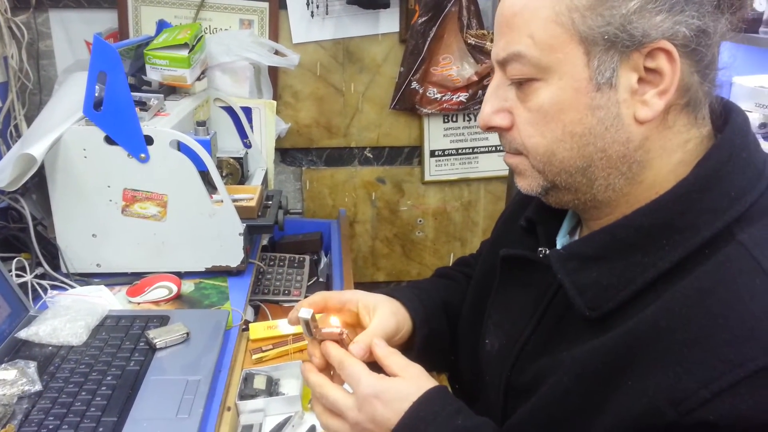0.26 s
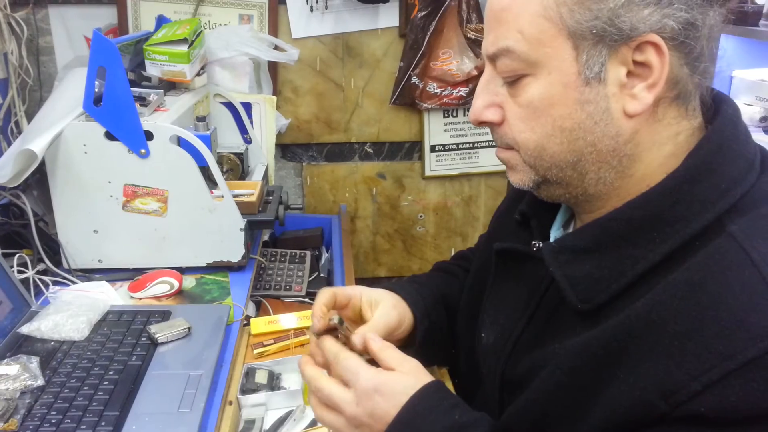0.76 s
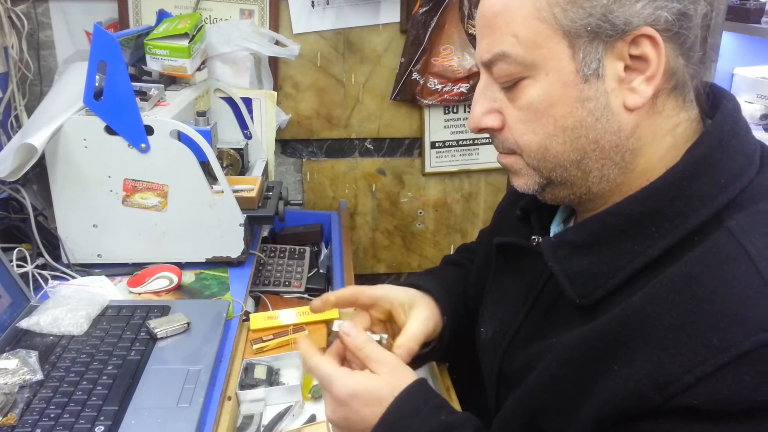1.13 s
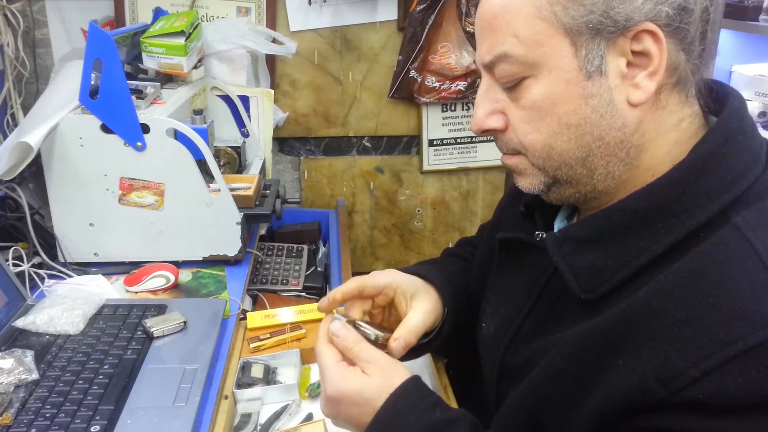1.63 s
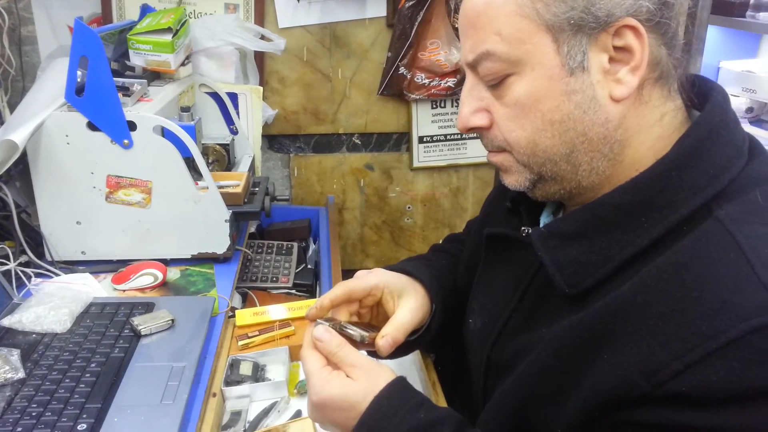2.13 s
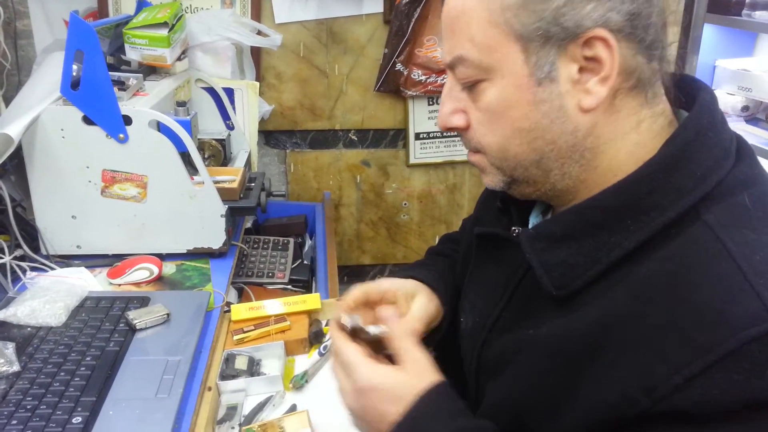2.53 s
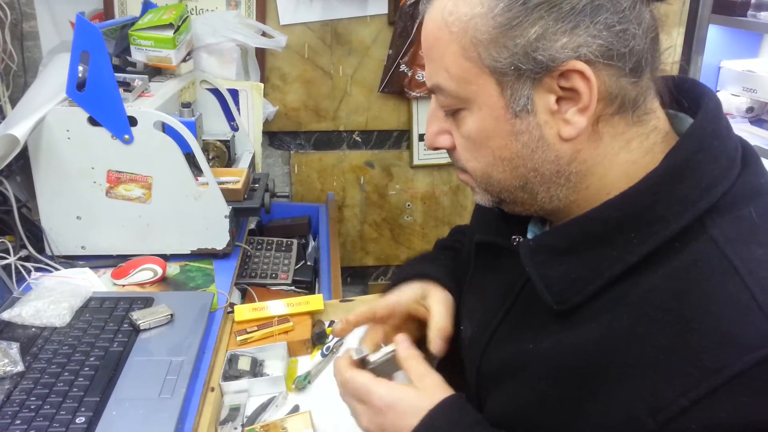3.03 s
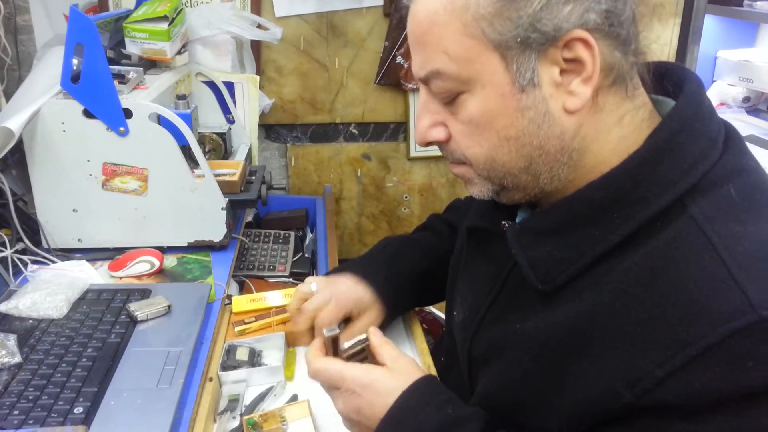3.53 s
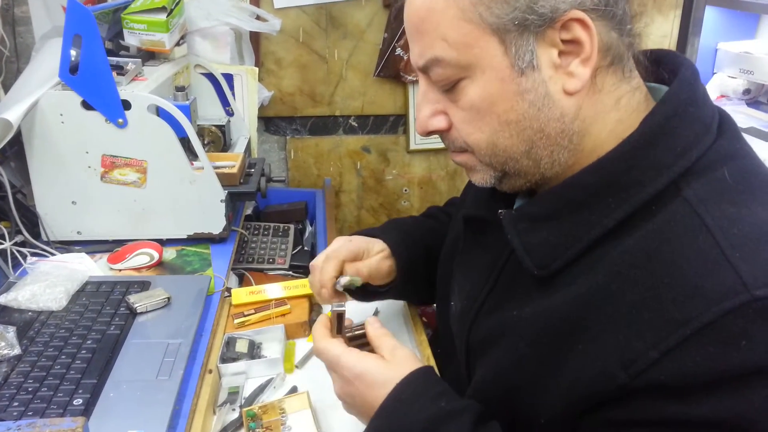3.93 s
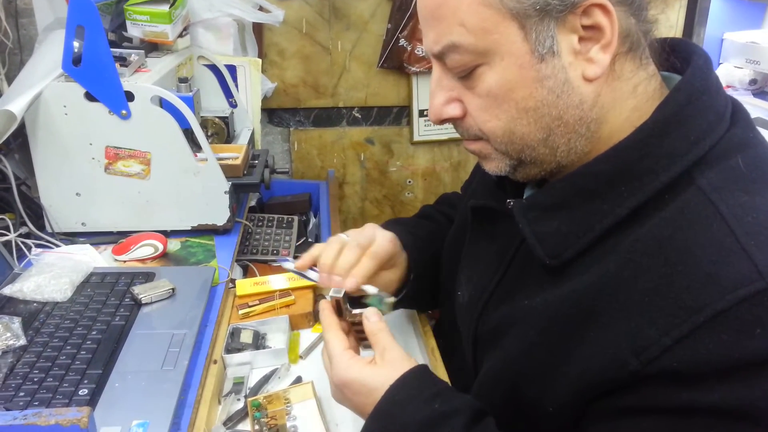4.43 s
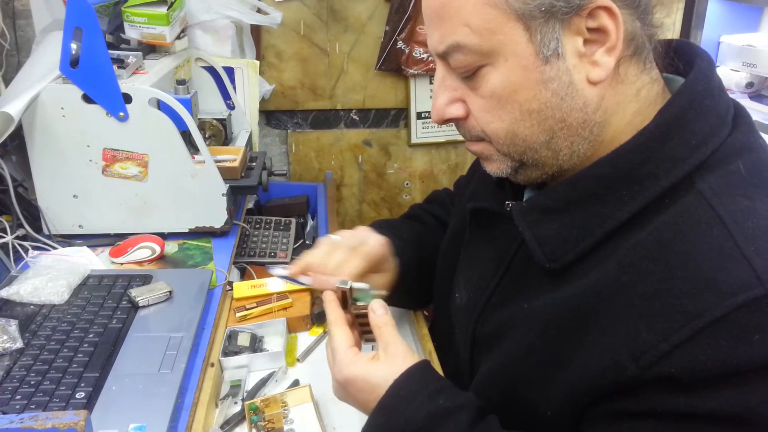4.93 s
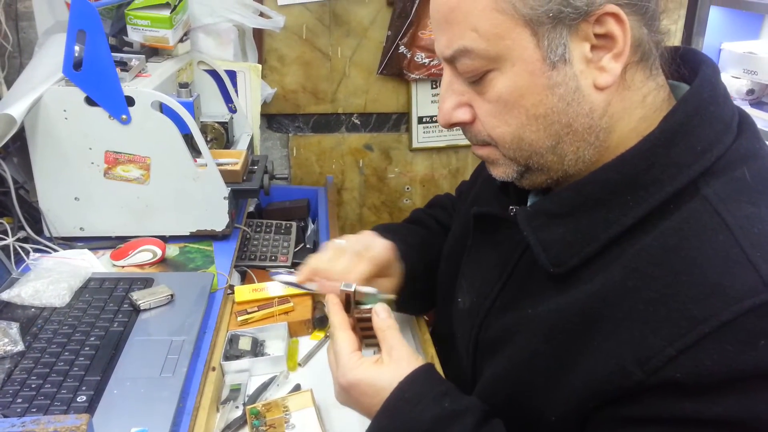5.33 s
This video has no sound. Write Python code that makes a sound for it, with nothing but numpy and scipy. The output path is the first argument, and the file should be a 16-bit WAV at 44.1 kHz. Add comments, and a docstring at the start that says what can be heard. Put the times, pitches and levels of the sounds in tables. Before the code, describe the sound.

Close to the microphone in a small, quiet shop, a metal lighter snaps shut with a sharp click, then flicks open with one short, clear ring. After a pause, a cardboard box is knocked and slid on a workbench with soft hollow taps and scrapes. It rubs against the lighter, which gives a small ringing tick and faint swishes. A low machine hum and hiss lie underneath.

```python
"""A low machine hum, room hiss and thin electrical whines fill a small shop. Near a two-port microphone
a metal lighter is snapped shut and flicked open: each impact excites the modes of its case, and the
lid rings with one clear note. Then a cardboard box is knocked and slid on the bench, its hollow body
resonating, and rubbed against the lighter with a soft hiss of friction."""
import sys
import numpy as np
from scipy import signal
from scipy.fft import rfft, irfft
from scipy.io import wavfile
from scipy.ndimage import uniform_filter1d, minimum_filter1d

SR = 44100
rng = np.random.default_rng(int(sys.argv[2]) if len(sys.argv) > 2 else 0)


def transcribe(u):
    """Save the signal u as a 16-bit wav file named by the first command-line argument.

    u: samples, shape (n,) or (channels, n), limited to [-1, 1]; the rate is SR.
    q: integer samples, one column per channel.
    """
    v = np.clip(np.atleast_2d(u).T, -1, 1)
    q = np.round(v * 32767).astype(np.int16)
    wavfile.write(sys.argv[1], SR, q)


N = 246166
EVENT_SAMPLES = 12000
NEAR_LAG_S, WIDE_LAG_S = 4 / SR, 16 / SR  # the right port hears later


def gain_of(db):
    """Amplitude grows tenfold for every 20 dB."""
    return 10 ** (np.asarray(db) / 20)


def unit_rms(x):
    """Normalisation to a mean power of one."""
    return x / np.sqrt(np.mean(x ** 2) + 1e-20)


def at_hz(points, hz):
    """Interpolation of a curve along a logarithmic frequency axis."""
    point_hz, value = np.transpose(points)
    return np.interp(np.log(hz + 1), np.log(point_hz + 1), value)


def smooth(x, span_s):
    """Two moving averages act as a low-pass filter."""
    size = round(span_s * SR)
    return uniform_filter1d(uniform_filter1d(x, size), size)


def add(mix, start_s, sound):
    """Superposition: a sound sums into the mix from its start time on."""
    part = mix[:, round(start_s * SR):][:, :sound.shape[1]]
    part += sound[:, :part.shape[1]]


def sides(pan_db):
    """A level difference, left over right, split evenly between the ports."""
    return gain_of(np.multiply.outer([.5, -.5], pan_db))


def colour(x, spectrum, tilt_db=0):
    """Minimum-phase filter, tilted by tilt_db per octave about 3 kHz; white noise keeps its power."""
    hz = abs(np.fft.fftfreq(4096, 1 / SR))
    shape_db = np.maximum(at_hz(spectrum, hz) + tilt_db * np.log2((hz + 50) / 3000), -100)
    log_gain = np.log(unit_rms(gain_of(shape_db)))
    taps = np.fft.ifft(np.exp(np.conj(signal.hilbert(log_gain)))).real
    return signal.fftconvolve(x, taps[None], axes=1)[:, :x.shape[1]]


def resonate(x, hz, width_hz):
    """A damped oscillator driven by x, with a gain near one at resonance."""
    radius, angle = np.exp(-np.pi * width_hz / SR), 2 * np.pi * hz / SR
    feedback = [1, -2 * radius * np.cos(angle), radius ** 2]
    return signal.lfilter([1 - radius ** 2], feedback, x) * np.sin(angle)


def noise(n, grain_db=0, lag_s=NEAR_LAG_S):
    """Partly coherent noise at two ports, alike in the bass, late on the right; grain makes it lumpy."""
    # likeness of the two ports: frequency_hz, correlation
    coherence = [(60, 0.92), (300, 1), (700, 0.85), (2000, 0.23), (6000, 0.2), (14000, 0.17)]
    left, unrelated = rfft(rng.standard_normal((2, n)))
    hz = np.fft.rfftfreq(n, 1 / SR)
    alike = np.clip(at_hz(coherence, hz), 0, 1)
    right = (alike * left + np.sqrt(1 - alike ** 2) * unrelated) * np.exp(-2j * np.pi * hz * lag_s)
    lumps = gain_of(grain_db * unit_rms(uniform_filter1d(rng.standard_normal(n), size=60)))
    return irfft([left, right], n) * unit_rms(lumps)


def burst(rise_s, t60_s, grain_db=0, lag_s=NEAR_LAG_S, bend=1):
    """Noise rises smoothly, then decays exponentially; a bend over 1 rounds the fall."""
    t = np.arange(EVENT_SAMPLES) / SR
    attack = np.sin(np.pi / 2 * np.clip(t / rise_s, 0, 1)) ** 2
    fall_db = -60 * (np.maximum(t - rise_s, 0) / t60_s) ** bend
    return noise(len(t), grain_db, lag_s) * attack * gain_of(fall_db)


def wavering(n, start_hz, end_hz, waver_hz, flicker_db=2.5):
    """Random frequency and amplitude modulation make a tone drift and flicker."""
    drift, flicker = (unit_rms(smooth(v, .02)) for v in rng.standard_normal((2, n)))
    cycles = np.cumsum(np.linspace(start_hz, end_hz, n) + waver_hz * drift) / SR
    port_phase = np.outer([0, 1], 2 * np.pi * start_hz * WIDE_LAG_S)
    return np.sin(2 * np.pi * cycles - port_phase) * gain_of(flicker_db * flicker)


def machine_hum():
    """A machine's periodic vibration gives two low, wavering tones that weaken late on."""
    # tones of the machine: pitch_hz, waver_hz, level_db
    partials = [(84, 4, -5), (145.2, 2.5, 0)]
    # course of the hum: time_s, gain_db
    course = [(0, -1), (4.0, 1.2), (4.3, -8.5), (5.58, -10)]
    hum = sum(gain_of(db) * wavering(N, hz, hz, waver_hz) for hz, waver_hz, db in partials)
    return hum * gain_of(np.interp(np.arange(N) / SR, *np.transpose(course)))


def swell(handling):
    """Envelope following: the gain of rumble and hum wanders, and lifts while the handling is loud."""
    # gain at rest: time_s, gain_db
    resting = [(0, -72), (1.3, -69), (2.1, -70), (2.8, -72.5), (4.2, -70), (5.58, -72)]
    knee_db, lift_per_db, max_lift_db, delay_s = -72, 0.29, 15.5, 0.024
    t = np.arange(N) / SR
    power_db = 10 * np.log10((handling ** 2).mean(0) + 1e-12)
    envelope_db = smooth(-minimum_filter1d(-power_db, size=200), .04)  # smoothed running maximum
    lift_db = np.clip(lift_per_db * (envelope_db - knee_db), 0, max_lift_db)
    late_lift_db = np.interp(t - delay_s, t, lift_db)
    wander_db = 0.5 * unit_rms(smooth(rng.standard_normal(N), .03))
    return gain_of(np.interp(t, *np.transpose(resting)) + late_lift_db + wander_db)


def shop(handling):
    """The noise floor: steady broadband hiss over a low rumble and hum that swell together."""
    # spectrum of the room hiss: frequency_hz, density_db
    hiss_spectrum = [(240, -31), (400, -15.5), (915, -11), (1700, -11.5), (3820, -19.5), (4650, -15.5),
                     (6570, -20), (9280, -19), (14600, -27.5)]
    # spectrum of the rumble: frequency_hz, density_db
    rumble_spectrum = [(15, -52), (30, -36), (55, -26), (78, -5.5), (112, -12.5), (144, -9), (248, -16),
                       (438, -20.5), (900, -32.5), (1500, -60)]
    hum = machine_hum()
    hiss = gain_of(-76.5) * colour(noise(N, lag_s=WIDE_LAG_S), hiss_spectrum)
    low_gain = swell(handling)
    rumble = colour(noise(N, lag_s=WIDE_LAG_S), rumble_spectrum)
    return hiss + low_gain * (rumble + hum)


def whines():
    """Narrowband tones: an electrical whine that keeps breaking off, and other thin tones."""
    # spans in which the whine sounds: start_s, end_s
    spans = [(.33, 1.28), (1.36, 1.92), (1.96, 2.55), (2.6, 3.19), (3.24, 5.1)]
    # other thin tones: start_s, end_s, start_hz, end_hz, waver_hz, level_db
    tones = [(0, 5.58, 7510, 7505, 6, -92), (.02, .33, 11200, 11700, 110, -84),
             (5.15, 5.45, 11700, 11350, 110, -82), (.23, .42, 812, 806, 3, -73),
             (.85, .91, 800, 790, 3, -80), (1.895, 1.93, 830, 810, 4, -76)]
    whine_hz, whine_waver_hz, whine_db = 9190, 30, -84.5
    whine = [(start_s, end_s, whine_hz, whine_hz, whine_waver_hz, whine_db) for start_s, end_s in spans]
    out = np.zeros((2, N))
    for start_s, end_s, start_hz, end_hz, waver_hz, db in whine + tones:
        n = round((end_s - start_s) * SR)
        fades = signal.windows.tukey(n, min(0.0076 / (end_s - start_s), 1))
        add(out, start_s, gain_of(db) * wavering(n, start_hz, end_hz, waver_hz) * fades)
    return out


def rubs():
    """Friction makes soft noise with one resonant band a stroke; strokes with a low band are duller on top."""
    # rubbing strokes: start_s, level_db, rise_s, t60_s, band_hz, band_db
    strokes = [(0.257, -74, 0.024, 0.26, 7800, -9), (1.063, -59, .0015, 0.15, 7990, -7),
               (1.679, -74.5, 0.026, .52, 4110, 11.5), (2.151, -65, 0.0026, 0.16, 6500, -5.5),
               (2.1572, -60, .0005, .085, 9700, 17), (2.53, -78.5, .03, .19, 11200, 5.5),
               (4.226, -68.5, .005, 0.22, 2100, 22), (4.242, -58.5, 0.0064, 0.21, 4200, 12.5),
               (4.391, -49, .005, 0.046, 4900, 5.5), (4.407, -44, 0.001, 0.049, 5200, 11.5),
               (4.41, -41, 0.0033, 0.12, 2500, -0.5), (4.446, -53, 0.019, 0.11, 5300, 9),
               (4.618, -65, 0.012, 0.58, 7360, -2), (4.667, -55.5, 0.023, .27, 12300, -9),
               (4.765, -60.5, 0.016, 0.18, 9500, 8), (4.811, -61, .014, .12, 7430, -6),
               (4.884, -61, 0.029, 0.23, 9410, -2), (4.998, -71.5, .02, .4, 9030, 0),
               (5.081, -67.5, .017, .3, 9000, -8.5), (5.184, -62, 0.021, 0.13, 9000, -3),
               (5.256, -58, 0.018, 0.21, 8200, -6), (5.378, -59.5, .024, 0.15, 9150, -4.5),
               (5.468, -60, .021, 0.17, 9000, -3)]
    # spectrum of the friction: frequency_hz, density_db
    friction = [(300, -4), (800, -3), (2200, -5), (5000, -7), (9500, -9), (12000, -11), (14500, -15)]
    out = np.zeros((2, N))
    for start_s, db, rise_s, t60_s, band_hz, band_db in strokes:
        low_band = band_hz < 6000
        tilt_db, top_hz, pan_db = (0.9, 10000, 1.2) if low_band else (2.06, 13000, 0.17)
        rub = colour(burst(rise_s, t60_s, lag_s=WIDE_LAG_S, bend=1.43), friction, tilt_db)
        rub = signal.sosfilt(signal.butter(6, top_hz, fs=SR, output="sos"), rub)
        singing = gain_of(band_db) * resonate(rub, band_hz, 0.1 * band_hz)
        add(out, start_s, gain_of(db) * sides(pan_db)[:, None] * (rub + singing))
    return out


def clicks():
    """Impact excitation: a short crack sets the modes of the metal case ringing; the room answers."""
    # metal impacts: start_s, level_db, t60_s, tilt_db_per_octave, ring_db, room_db, pan_db,
    # band_hz, band_db
    impacts = [(.6375, -59.5, 0.046, 0.35, -32, -30.5, -2, 9900, 6.5),
               (0.644, -60, 0.023, 1.3, -34, -30, -2.5, 9900, 3.5),
               (0.6563, -30, .05, 0.5, -34, -29.5, -0.6, 3287, -2.2),
               (.6602, -8, .036, 1.2, -24, -10, 2, 7500, 4),
               (1.0762, -46.5, 0.073, 2, -34, -13, 10, 12900, -11),
               (1.0853, -21, 0.076, -1.4, -45.5, -14, -1, 2953, -0.5),
               (4.6831, -47.5, 0.04, -1.2, -41.5, -0.5, -0.2, 12440, -4)]
    # faint high ticks, most where the whine breaks off: start_s, level_db
    ticks = [(0.3954, -78.5), (1.2784, -71), (1.289, -73.5), (1.3494, -80), (1.9226, -74), (2.5576, -76.5),
             (3.1954, -76.5)]
    # timbre of every tick: the columns of impacts from t60_s on
    tick_timbre = (0.09, -1.5, -38, -2.5, 1.5, 11000, 8.5)
    # spectrum of the crack: frequency_hz, density_db
    crack = [(180, -59.5), (300, -36.5), (1250, -18.5), (2000, -7.5), (2320, -8.5), (3650, 3.5), (6240, -9),
             (7450, -3.5), (10700, -7), (12300, -6), (14500, -16)]
    # modes of the case: pitch_hz, level_db, t60_s
    case_modes = [(880, 13, .01), (1552, -4, 0.019), (2029, -2.5, 0.009), (2983, -6.5, 0.056),
                  (3443, -5, .025), (4980, -2, .035), (6200, -8, 0.0081), (6900, -11, 0.032),
                  (7440, -1.5, .02), (9030, -1, .02), (10260, -8.5, .015), (12060, 0.5, 0.01),
                  (12810, -2, 0.013)]
    events = impacts + [tick + tick_timbre for tick in ticks]
    out, echoes = np.zeros((2, N)), room()
    for start_s, db, t60_s, tilt_db, ring_db, room_db, pan_db, band_hz, band_db in events:
        blow = burst(0.00016, t60_s, grain_db=1)
        ring = sum(gain_of(mode_db) * np.sqrt(decay_s * SR) * resonate(blow, hz, 3.8 / decay_s)
                   for hz, mode_db, decay_s in case_modes)
        bright = gain_of(band_db) * resonate(blow, band_hz, 0.24 * band_hz)
        direct = colour(blow + bright + gain_of(ring_db) * ring, crack, tilt_db)
        reflected = signal.fftconvolve(direct, echoes, axes=1)[:, :direct.shape[1]]
        add(out, start_s, gain_of(db) * sides(pan_db)[:, None] * (direct + gain_of(room_db) * reflected))
    return out


def room(wall_delay_s=.019):
    """Reverberation: sparse echoes begin with the far wall, and each band decays at its own rate."""
    # reverberation times: frequency_hz, t60_s
    decay_times = [(300, 0.049), (1200, 0.074), (2000, 0.092), (4000, .17), (7500, 0.14), (11000, 0.12),
                   (14000, 0.21)]
    reflections = noise(EVENT_SAMPLES) * (rng.random(EVENT_SAMPLES) < .2)
    hz, t, bands = signal.stft(reflections, SR, nperseg=128)
    decay = gain_of(-60 * t / at_hz(decay_times, hz)[:, None])
    tail = signal.istft(bands * decay, SR, nperseg=128)[1]
    tail *= np.clip(np.arange(tail.shape[1]) / SR / 0.001, 0, 1)  # 1 ms fade-in
    return np.pad(tail / np.linalg.norm(tail[0]), ((0, 0), (round(wall_delay_s * SR), 0)))


def lid(pitch_hz=3400, overtone_hz=7440):
    """Free vibration: one mode swells and dies, out of phase at the ports, with a brief overtone."""
    # notes of the lid: start_s, level_db, swell_s, t60_s, pan_db, left_lead_rad, overtone_db
    notes = [(1.055, -61.5, 0.01193, .1, -3, -1, -75), (1.0864, -16, 0.02, 0.1, -10.5, -2.2, -43.5),
             (4.683, -44, 0.0062, 0.092, 0.5, 2, -42), (4.774, -55.5, 0.036, 0.073, 0, 2.1, -62)]
    out, t = np.zeros((2, N)), np.arange(EVENT_SAMPLES) / SR
    onset = np.minimum(t / 0.0025, 1)
    for start_s, db, swell_s, t60_s, pan_db, lead_rad, overtone_db in notes:
        note = np.sqrt(2) * np.sin(2 * np.pi * pitch_hz * t + np.array([[lead_rad], [0]]))
        rising = gain_of(-6.5 * np.maximum(1 - t / swell_s, 0))
        since_peak_s = np.maximum(t - swell_s, 0)
        dying = sides(pan_db)[:, None] * gain_of(-60 * (since_peak_s / t60_s) ** 1.4)  # rounded fall
        lingering = gain_of(-33 - 60 * since_peak_s / .3)
        overtone = np.sin(2 * np.pi * overtone_hz * t) * gain_of(overtone_db - 60 * t / 0.11)
        add(out, start_s, (gain_of(db) * rising * (dying + lingering) * note + overtone) * onset)
    return out


def hollow(x):
    """Resonance: the hollow box reinforces the bands near its modes."""
    # modes of the box: pitch_hz, width_hz, gain_db
    box_modes = [(530, 170, -2.5), (1040, 29, -5.5), (1600, 17, -17), (1720, 150, -9), (2160, 56, -5),
                 (2450, 80, -16), (3150, 44, -42)]
    return x + 1.4 * sum(gain_of(db) * resonate(x, hz, width_hz) for hz, width_hz, db in box_modes)


def box():
    """Forced vibration of cardboard: knocks ring the struck spot; sliding friction drives body and edge."""
    # spectrum of cardboard: frequency_hz, density_db
    card = [(35, -39.5), (60, -18), (140, -15), (194, -14.5), (394, -3.5), (733, -2.5), (988, 0.5),
            (1110, -7), (1750, -3.5), (2590, -8), (10000, -19), (14500, -42.5)]
    # knocks on the box: start_s, level_db, t60_s, tilt_db_per_octave, spot_hz, spot_db
    knocks = [(3.401, -39, 0.068, -2, 3390, 15), (3.432, -38, 0.15, -4.5, 1570, 1),
              (3.453, -37, 0.048, -2.7, 3130, 9), (3.489, -31.5, 0.073, -1.8, 997, 5),
              (3.55, -59, 0.38, 5.5, 700, 17), (3.5581, -28.5, 0.081, -0.34, 1700, 8),
              (3.573, -46.5, 0.09, -10, 494, 13.5), (3.6885, -62, 0.063, 2.5, 2100, 26),
              (3.732, -44, .1, -1, 826, 8), (3.819, -44.5, 0.23, -2.8, 1010, 6),
              (3.84, -35.5, 0.094, -1.2, 421, 18), (3.847, -40, 0.15, -2, 4960, 15),
              (3.884, -42, 0.12, 1.5, 446, -6), (3.928, -41, 0.14, -3.5, 1000, 7.5),
              (3.96, -55.5, 0.069, -0.5, 1010, 23), (4.243, -62, 0.13, 2, 713, 26)]
    # one envelope for each slide: time_s, body_db, scrape_over_body_db
    slides = [
        [(3.36, -72, -14), (3.4, -53, -5), (3.49, -44, -7), (3.532, -60, -13), (3.56, -30, -14),
         (3.64, -81, 1.5)],
        [(3.684, -67, 11), (3.708, -53.5, 6.5), (3.83, -46, -14), (3.846, -36, -7.5), (3.896, -44.5, -12),
         (3.962, -48, -17.5), (4.05, -76.5, -0.5)],
        [(4.21, -89, 0.5), (4.25, -56.5, -2), (4.3, -88, 2), (4.34, -84, 15.5)],
    ]
    # resonances under the sliding edge: pitch_hz, width_hz, gain_db
    edge_modes = [(2100, 300, 11), (3100, 250, 5), (4150, 400, 12)]
    out = np.zeros((2, N))
    for start_s, db, t60_s, tilt_db, spot_hz, spot_db in knocks:
        blow = colour(burst(0.0013, t60_s, grain_db=1.7), card, tilt_db)
        spot = gain_of(spot_db) * resonate(blow, spot_hz, 0.081 * spot_hz)
        add(out, start_s, gain_of(db) * (hollow(blow) + spot))
    for slide in slides:
        time_s, body_db, scrape_db = np.transpose(slide)
        t = np.arange(time_s[0], time_s[-1], 1 / SR)
        body = unit_rms(hollow(colour(noise(len(t), grain_db=1.6), card, tilt_db=-2.5)))
        grit = colour(noise(len(t), grain_db=2.6), card, tilt_db=4.8)
        edge = sum(gain_of(db) * resonate(grit, hz, width_hz) for hz, width_hz, db in edge_modes)
        scrape = unit_rms(grit + edge) * gain_of(np.interp(t, time_s, scrape_db))
        envelope = gain_of(np.interp(t, time_s, body_db)) * signal.windows.tukey(len(t), .04)
        add(out, time_s[0], (body + scrape) * envelope)
    return out


def scene():
    """Superposition of the handled lighter and box and the background of the shop."""
    handling = clicks() + lid() + box() + rubs()
    return handling + shop(handling) + whines()


def record(dry):
    """Transduction: each port colours the sound, sheds deep bass, clips on overload and limits the band."""
    # level difference between the ports: frequency_hz, left_over_right_db
    port_balance = [(60, -1), (110, 0.5), (200, -2), (370, -1.5), (680, -1), (1250, -2.5), (2290, 1),
                    (4200, -6), (7700, 6), (14100, 10.5)]
    bass_cut_hz, top_hz = 35, 14700
    hz = np.fft.rfftfreq(N, 1 / SR)
    high_pass = hz ** 2 / (hz ** 2 + bass_cut_hz ** 2)
    ported = irfft(rfft(dry) * sides(at_hz(port_balance, hz)) * high_pass, N)
    clipped = np.clip(ported, -1, 1)
    low_pass = signal.firwin(511, top_hz, window=("kaiser", 9), fs=SR)
    return np.clip(signal.oaconvolve(clipped, low_pass[None], "same"), -1, 1)


dry = scene()
out = record(dry)
transcribe(out)
```